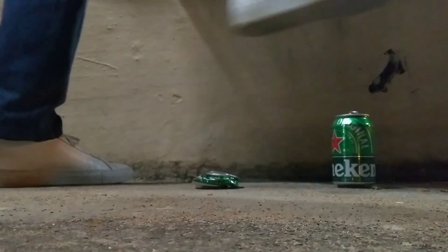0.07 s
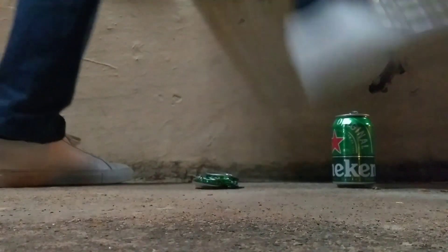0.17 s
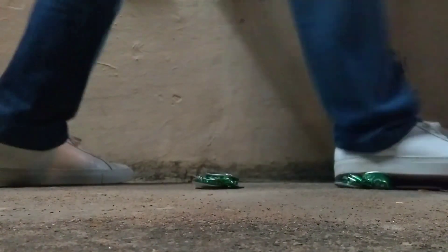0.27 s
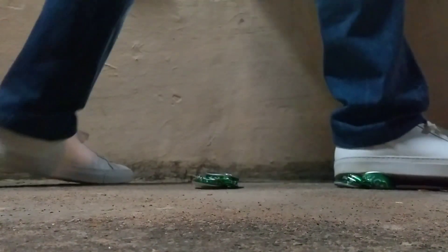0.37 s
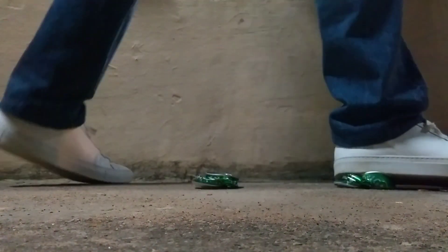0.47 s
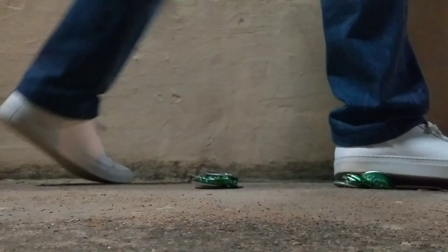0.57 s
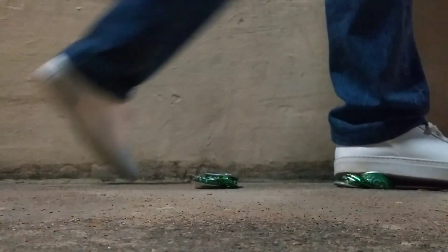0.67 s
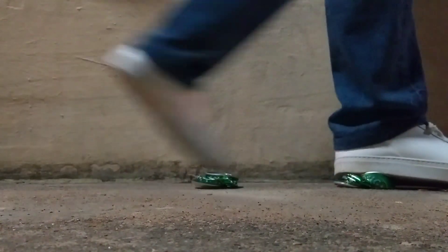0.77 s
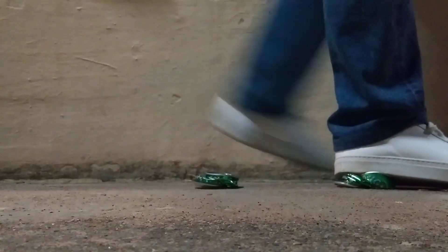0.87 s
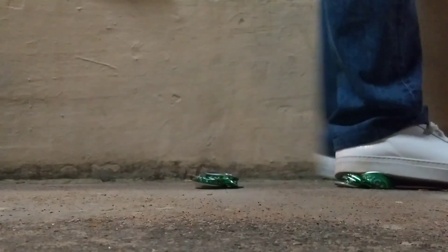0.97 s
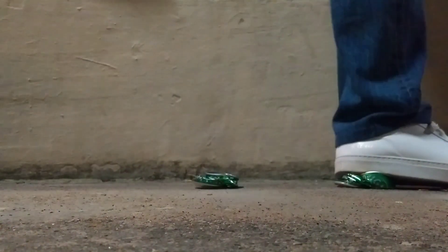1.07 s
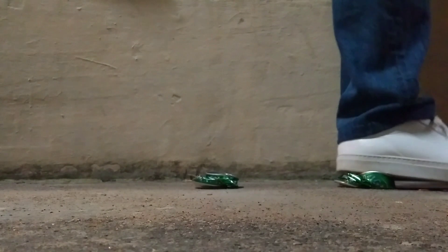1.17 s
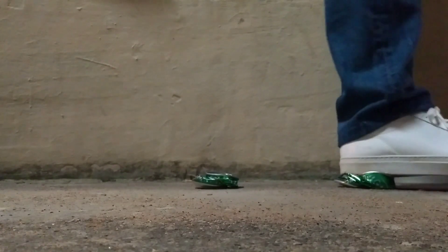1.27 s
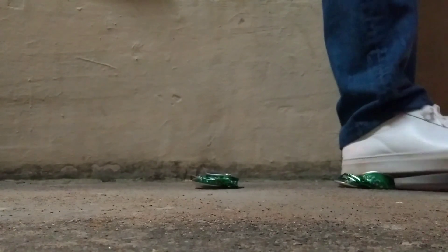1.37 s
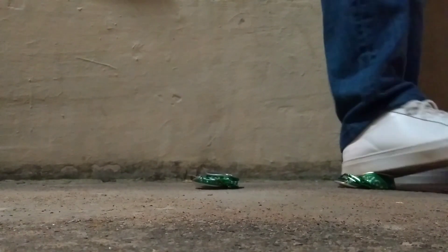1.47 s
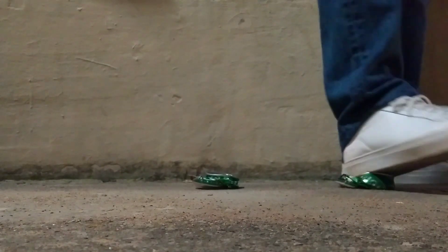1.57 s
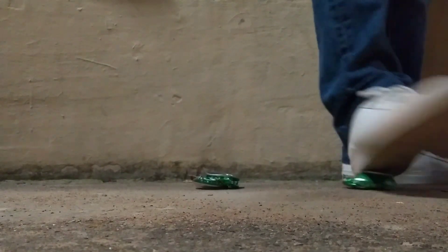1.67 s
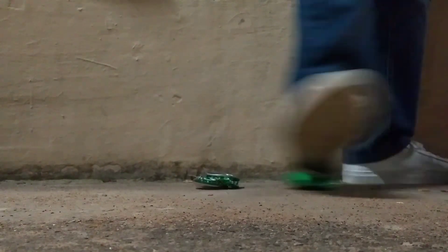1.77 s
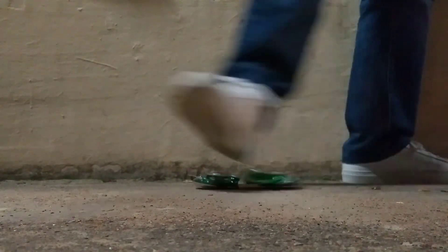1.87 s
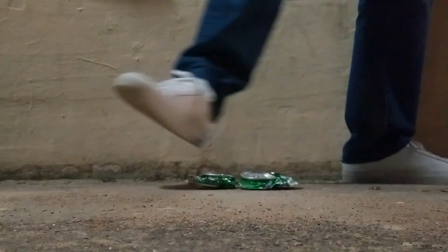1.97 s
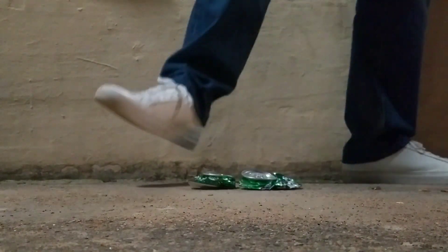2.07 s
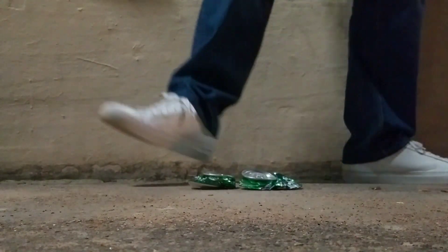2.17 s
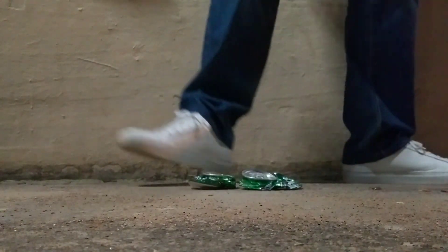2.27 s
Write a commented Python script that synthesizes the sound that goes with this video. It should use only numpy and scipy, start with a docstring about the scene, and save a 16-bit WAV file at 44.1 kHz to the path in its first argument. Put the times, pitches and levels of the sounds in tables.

```python
"""Over a steady rush and low rumble lies a faint bright hiss; then a shoe stamps an aluminium can flat on concrete.
The stamp is dense clicks exciting wall modes, with a noise thud and thump, loud enough to overload the microphone.
The crushed can creaks and snaps as the weight comes off, then is kicked aside and clatters to rest: each blow
is noise bursts around a sum of decaying sine modes, and grit is random clicks through a filter.
A bare room rings through convolution with banded noise; hiss and background are filtered noise."""
import sys
import numpy as np
from scipy import signal
from scipy.fft import rfft, irfft, next_fast_len
from scipy.io import wavfile

SR = 44100
rng = np.random.default_rng(int(sys.argv[2]) if len(sys.argv) > 2 else 0)


def store_wav(level_fs):
    """Save 16-bit WAV to argv[1]."""
    pcm = np.round(np.clip(np.atleast_2d(level_fs), -1, 1) * 32767)
    wavfile.write(sys.argv[1], SR, pcm.T.astype(np.int16))


N = 101430   # samples, 2.3 s
T = np.arange(N) / SR


def from_db(db):
    """Logarithmic level: 20 dB is a factor of ten in amplitude."""
    return 10 ** (np.asarray(db) / 20)


def rms_one(x):
    """Power normalisation: the root mean square becomes one."""
    return x / np.sqrt(np.mean(x ** 2) + 1e-20)


def level(rows):
    """Amplitude envelope: levels run straight in dB between points, and are silent outside them."""
    start_s, level_db = np.transpose(rows)
    return from_db(np.interp(T, start_s, level_db, left=-150, right=-150))


def at_hz(points, hz):
    """Logarithmic pitch: a table is interpolated evenly per octave."""
    pitch_hz, value = np.transpose(points)
    return np.interp(np.log(np.maximum(hz, 1)), np.log(pitch_hz), value)


def decay(t, t60):
    """Exponential decay: a positive t60 is the time to fall by 60 dB."""
    return np.exp(-np.log(1000) * t / t60)


def colour(x, points):
    """Minimum-phase filtering: the folded cepstrum makes it causal; white noise keeps its power."""
    size = 2 * next_fast_len(N)
    gain = rms_one(from_db(at_hz(points, np.fft.rfftfreq(size, 1 / SR))))
    cepstrum = irfft(np.log(gain))
    cepstrum[1:size // 2] *= 2
    cepstrum[size // 2 + 1:] = 0
    response = np.exp(rfft(cepstrum))
    return irfft(rfft(x, size) * response)[:N]


def grains(per_s, spread_db):
    """Shot noise: random clicks of uneven size and either sign, with unit power."""
    size_db = spread_db * np.minimum(rng.exponential(1, N), 3)
    sizes = from_db(size_db) * rng.choice([-1, 1], N)
    happens = rng.random(N) < per_s / SR
    return rms_one(sizes * happens)


def add(out, start_s, sound):
    """Superposition: a sound is summed in at its start time."""
    start = int(start_s * SR)
    out[start:start + len(sound)] += sound[:N - start]


# standard deviations from ring to ring: mode strength in dB, mode tuning as a fraction of its pitch
MODE_SPREAD_DB, MODE_DETUNE = 4.5, 0.014


def ringing(modes):
    """Modal superposition: decaying sines, each with a random strength, sign and tuning."""
    hz, db, t60 = np.transpose(modes)[:, :, None]
    strength, tuning = rng.standard_normal((2, len(modes), 1))
    gains = from_db(db + MODE_SPREAD_DB * strength) * rng.choice([-1, 1], hz.shape)
    t = T[:SR // 5]
    waves = np.sin(2 * np.pi * hz * (1 + MODE_DETUNE * tuning) * t) * decay(t, t60)
    return (gains * waves).sum(0) / np.sqrt(np.sum(gains ** 2))


# the can wall buckles under the stamp: start_s, level_db (of the crackle)
BUCKLING = [(.229, -42), (.2335, -3), (.238, 1.5), (.257, -9.5), (.263, -8.5), (.273, -16), (.277, -28),
            (.285, -9), (.2915, -31), (.295, -18), (.307, -28.5), (.318, -51)]
# spectrum of the buckling crackle: pitch_hz, level_db (relative)
BUCKLE_COLOUR = [(200, -37), (600, -20), (1200, 0.5), (2300, 2.5), (4000, 3.5), (8000, 1.5), (10500, 2),
                 (12000, -2.5), (15500, -12)]
# modes of the can wall: pitch_hz, level_db (relative)
WALL_MODES = [(781, -6), (945, -4), (1095, -5), (1202, -3), (1340, -5), (2660, -3), (4075, 0), (4457, -2),
              (4968, -2), (5290, -2), (5410, -3), (6722, -3), (7250, -4), (8167, 0), (10243, -4)]
# the sole drives the can into the floor: start_s, level_db
THUD = [(.2305, -20), (.232, -0.5), (.245, -5.5), (.259, -2.5), (.263, -26), (.295, -21.5), (.32, -55)]
# spectrum of the thud: pitch_hz, level_db (relative)
THUD_COLOUR = [(40, -15), (60, -4.5), (130, -5), (230, 0), (320, 1.5), (450, 0), (700, 1.5), (1200, -0.5),
               (1700, -6), (3000, -19)]
# the body's weight lands: start_s, level_db (of the low thump)
THUMP = [(.24, -41), (.258, -30.5), (.285, -22), (.31, -36), (.35, -65)]
# spectrum of the thump: pitch_hz, level_db (relative)
THUMP_COLOUR = [(30, -11.5), (45, -2), (57, 2.5), (90, -8), (160, -11), (300, -23), (1000, -56)]
BUCKLES_PER_S, BUCKLE_SPREAD_DB = 3500, 2
WALL_RING_DB, WALL_T60_S = -5, 0.03


def stamp():
    """Impulsive excitation: buckles ring modes that shift as the can folds; sole and weight add noise bursts."""
    buckles = grains(BUCKLES_PER_S, BUCKLE_SPREAD_DB) * level(BUCKLING)
    wall_modes = [(hz, db, WALL_T60_S) for hz, db in WALL_MODES]
    first, last = int(BUCKLING[0][0] * SR), int(BUCKLING[-1][0] * SR)
    wall = np.zeros(N)
    # twelve successive folds, each with freshly varied modes
    for fold in np.array_split(np.arange(first, last), 12):
        ring = ringing(wall_modes)
        ring = ring / np.linalg.norm(ring)
        add(wall, fold[0] / SR, signal.fftconvolve(buckles[fold], ring))
    crackle = colour(buckles, BUCKLE_COLOUR)
    thud = colour(rng.standard_normal(N) * level(THUD), THUD_COLOUR)
    thump = colour(rng.standard_normal(N), THUMP_COLOUR) * level(THUMP)
    return crackle + from_db(WALL_RING_DB) * wall + thud + thump


FAVOUR_DB, FAVOUR_OCTAVES = 7, .35   # greatest boost and its half-width (at 1/e of the dB)


def favoured(modes, centre_hz):
    """Position-dependent excitation: the point of contact brings out the modes near one pitch."""
    hz, db, t60 = np.transpose(modes)
    octaves = np.log2(hz / centre_hz)
    boost_db = FAVOUR_DB * np.exp(-(octaves / FAVOUR_OCTAVES) ** 2)
    return np.transpose([hz, db + boost_db, t60])


# spectrum of the bright contact noise and of the grit under the pinned can: pitch_hz, level_db (relative)
FIZZ_COLOUR = [(3500, -3.5), (6000, -5.5), (7500, 2), (8600, -1.5), (10300, 3.5), (12000, -10.5),
               (13600, -8), (15500, -20)]
# spectrum of the highest contact noise: pitch_hz, level_db (relative)
SPARKLE_COLOUR = [(9000, -30), (12000, -8), (13500, 3), (14400, -9), (15500, -16)]
CHATTER = 0.3   # strength of the tiny contacts after each blow's first


def blows(rows, gains_db, t60, modes, crack_colour):
    """Contact excitation: a dying flurry gives crack, rough ring, fizz and, for snaps, sparkle."""
    layers = np.zeros((4, N))
    t = T[:SR // 12]
    fade = decay(t, t60)
    for start_s, *levels_db, centre_hz in rows:
        flurry = rng.standard_normal((4, len(t))) * fade
        contact = flurry[1] * fade   # faded twice, so it dies twice as fast
        contact *= CHATTER / np.linalg.norm(contact)
        contact[0] += 1
        ring = ringing(favoured(modes, centre_hz))
        body = signal.fftconvolve(ring, contact)
        body *= np.linalg.norm(ring) / np.linalg.norm(body)
        sounds = flurry[0], body, flurry[2], flurry[3]
        # knocks have three levels, so their sparkle stays silent
        for layer, sound, level_db, gain_db in zip(layers, sounds, levels_db, gains_db):
            add(layer, start_s, from_db(level_db + gain_db) * sound)
    crack, body, fizz, sparkle = layers
    noise = colour(crack, crack_colour) + colour(fizz, FIZZ_COLOUR) + colour(sparkle, SPARKLE_COLOUR)
    return noise + body


# creases snap as the weight shifts and the foot rolls off; levels before SNAP_GAINS_DB:
# start_s, crack_db, body_db, fizz_db, sparkle_db, pitch_hz (of the favoured ring)
SNAPS = [(.3965, -46, -34, -34, -39, 4300), (1.1105, -31, -33, -44, -49, 4200),
         (1.1337, -49, -28, -29, -31, 4345), (1.1925, -39.5, -43, -28, -38.5, 10400),
         (1.218, -13.5, -14.5, -25, -21, 2620), (1.2345, -43, -45.5, -30, -41, 10400),
         (1.505, -25, -20, -21.5, -34, 2840), (1.522, -29, -35, -41, -46, 10400),
         (1.5411, -10.5, -11, -19.5, -38, 1420), (1.5554, -13.5, -19.5, -19, -32, 1370),
         (1.6313, -31, -27.5, -54, -55, 2000), (1.6523, -23, -23, -25.5, -38, 4300),
         (1.6684, -22, -30, -27, -42, 4270)]
# modes of the can pinned under the sole: pitch_hz, level_db (relative), t60_s
PINNED_MODES = [(1230, -6, .03), (1360, -1, .045), (1700, -7, .03), (2020, -8, .025), (2620, -6, .02),
                (3050, -9, .02), (3900, -10, .012), (4300, -7, .014), (4900, -9, .014), (5850, -11, .014),
                (9400, -14, .008), (10400, -12, .008)]
# spectrum of the snaps' crack: pitch_hz, level_db (relative)
PINNED_CRACK_COLOUR = [(150, -29), (600, 0), (1300, 10.5), (2000, -12), (2330, -2), (2700, 2), (3500, -8),
                       (5000, -1), (6300, -11), (9000, -7)]
# grit grinds under the can in place: start_s, level_db
GRINDING = [(1.05, -77.5), (1.06, -50), (1.08, -49), (1.125, -59), (1.155, -48), (1.175, -59), (1.24, -47),
            (1.28, -67), (1.32, -82), (1.47, -65.5), (1.53, -52.5), (1.565, -33), (1.59, -54), (1.625, -61),
            (1.675, -37)]
SNAP_GAINS_DB, SNAP_T60_S = (-8, 0, -4, -6), 0.035   # gains of crack, body, fizz, sparkle
GRIT_PER_S, GRIT_SPREAD_DB = 1500, 3.5   # also used for the slide


def creaking():
    """Stored strain released: the pinned can grinds on grit and its creases spring back."""
    grit = colour(grains(GRIT_PER_S, GRIT_SPREAD_DB) * level(GRINDING), FIZZ_COLOUR)
    snaps = blows(SNAPS, SNAP_GAINS_DB, SNAP_T60_S, PINNED_MODES, PINNED_CRACK_COLOUR)
    return grit + snaps


# the kicked can hits shoe and floor; levels before KNOCK_GAINS_DB:
# start_s, crack_db, body_db, fizz_db, pitch_hz (of the favoured ring)
KNOCKS = [(1.6848, -18, -21, -27, 1250), (1.6935, -41, -28, -24, 3080), (1.7011, -9, -11.5, -16, 1270),
          (1.7135, 0.5, -6, -24, 2070), (1.7195, 3.5, -0.5, -6, 2600), (1.7265, -7, -5, -23, 1300),
          (1.7342, -15, -16, -18, 1210), (1.7438, -18, -8, -13, 1600), (1.7544, -22, -4, -27, 1150),
          (1.7595, -30, -14, -23.5, 1090), (1.7806, -19, -12, -22, 1770), (1.7918, -11, -6, -34, 1750),
          (1.7985, -30, -26, -25.5, 3100), (1.8212, -39, -18, -37, 1870), (1.830, -33, -11, -33, 1520),
          (1.8516, -26, -15, -33, 1300), (1.8545, -21.5, -24, -33, 1174), (1.8749, -25, -17.5, -43, 1190),
          (1.9132, -16, -15, -29, 1520), (1.933, -27, -26, -37, 2030), (1.949, -29, -22, -38, 1550),
          (1.956, -30, -45, -47, 2030), (1.9728, -48, -26, -53, 3150), (1.9925, -52, -38, -53, 3161),
          (2.0063, -35, -32.5, -48, 3120), (2.0385, -30, -43, -43.5, 3100), (2.1208, -45, -51, -57, 5300),
          (2.1939, -43.5, -49, -55, 5400)]
# modes of the loose, flattened can: pitch_hz, level_db (relative), t60_s
LOOSE_MODES = [(685, -11, .035), (1090, -3, .045), (1225, -5, .035), (1592, -2, .04), (1675, -4, .035),
               (1905, -1, .035), (2025, -1, .035), (2490, -7, .03), (2672, -7, .03), (2980, -8, .03),
               (3115, -7, .04), (3400, -12, .03), (3980, -10, .03), (5100, -18, .025)]
# spectrum of the knocks' crack: pitch_hz, level_db (relative)
LOOSE_CRACK_COLOUR = [(150, -19.5), (600, 1), (1300, 3), (1900, 4), (2330, -6.5), (2700, -1), (3300, 0.5),
                      (4200, -3), (5100, -2.5), (6300, -4.5), (9000, -23)]
# grit grinds under the can as it slides: start_s, level_db
SLIDE = [(1.683, -34), (1.688, -24), (1.711, -17), (1.715, -9.5), (1.725, -10), (1.738, -21.5),
         (1.765, -46), (1.80, -44), (1.84, -40), (1.90, -52), (1.95, -38.5), (2.04, -53), (2.08, -58)]
# spectrum of the sliding scrape: pitch_hz, level_db (relative)
SLIDE_COLOUR = [(80, -29), (300, 5.5), (700, -0.5), (1200, 13), (2000, -7), (2330, -17), (2700, 7.5),
                (4200, -0.5), (6300, -5), (10300, -5.5), (12000, -13), (15500, -20)]
KNOCK_GAINS_DB, KNOCK_T60_S = (-2, 3, 0.5), 0.03   # gains of crack, body, fizz


def kick():
    """Sliding friction and repeated impact: the flat can scrapes over the concrete and rocks to rest."""
    scrape = colour(grains(GRIT_PER_S, GRIT_SPREAD_DB) * level(SLIDE), SLIDE_COLOUR)
    knocks = blows(KNOCKS, KNOCK_GAINS_DB, KNOCK_T60_S, LOOSE_MODES, LOOSE_CRACK_COLOUR)
    return scrape + knocks


# a faint bright hiss, fading slightly before the stamp: start_s, level_db
HISS = [(0, -54), (.08, -54), (.16, -55), (.23, -58)]
# spectrum of the hiss: pitch_hz, level_db (relative)
HISS_COLOUR = [(1000, -6), (3500, -2), (8500, -5.5), (11000, -12), (15000, -31)]


def faint_hiss():
    """Shaped noise: filtered noise under a slow envelope."""
    return colour(rng.standard_normal(N), HISS_COLOUR) * level(HISS)


# reverberation time, where a negative one makes the band swell: pitch_hz, t60_s
ROOM_T60 = [(250, -2.2), (1000, 2.5), (3500, 1.74), (8000, 1), (11000, 0.28), (14000, .32)]
# strength of the tail by band: pitch_hz, level_db
ROOM_COLOUR = [(100, -34), (1000, -20.5), (2300, -27), (3800, -24), (5500, -27.5), (8500, -23),
               (12000, -22.5), (15000, -28.5)]
ROOM_BUILD_S = 0.004   # time constant of the onset
ECHO_S, ECHO_WIDTH_S, ECHO_GAIN = .11, 0.075, 2.1   # a cluster of reflections from the far wall


def room(x):
    """Diffuse reverberation: a one-second noise tail, dying band by band but swelling in the lowest bands."""
    t, edges = T[:SR], np.geomspace(100, 17000, 20)
    tail = np.zeros(SR)
    for low, high in zip(edges, edges[1:]):
        hz = np.sqrt(low * high)
        fade = decay(t, at_hz(ROOM_T60, hz)) * (1 - np.exp(-t / ROOM_BUILD_S))
        fade *= 1 + ECHO_GAIN * np.exp(-((t - ECHO_S) / ECHO_WIDTH_S) ** 2)
        band_filter = signal.butter(2, [low, high], "band", fs=SR, output="sos")
        band = signal.sosfilt(band_filter, rng.standard_normal(SR))
        tail += from_db(at_hz(ROOM_COLOUR, hz)) * band * fade / np.linalg.norm(fade)
    return signal.fftconvolve(x, tail)[:N]


# spectrum of the steady rush: pitch_hz, level_db (relative, per Hz)
RUSH = [(15, -37.5), (25, -5.5), (48, 0), (75, 2.5), (113, -1.5), (169, -5.5), (274, -8), (340, -9.5),
        (421, -10), (582, -7.5), (871, -5.5), (1050, -5.5), (1410, -9), (1800, -19.5), (1950, -19.5),
        (2700, -33), (3170, -30), (4500, -37), (5430, -43.5), (5880, -43.5), (7700, -42.5), (10100, -56.5),
        (15500, -54.5)]
RUSH_DB = -30.5
RUMBLE_HZ, RUMBLE_WIDTH_HZ, RUMBLE_DB = 61.5, 54, -43


def background():
    """Resonance-filtered noise: a steady broadband rush with a wavering low rumble."""
    radius = np.exp(-np.pi * RUMBLE_WIDTH_HZ / SR)
    poles = [1, -2 * radius * np.cos(2 * np.pi * RUMBLE_HZ / SR), radius * radius]
    rumble = signal.lfilter([1, 0, -1], poles, rng.standard_normal(N + SR))[SR:]   # already settled
    rush = colour(rng.standard_normal(N), RUSH)
    return from_db(RUSH_DB) * rms_one(rush) + from_db(RUMBLE_DB) * rms_one(rumble)


STAMP_ROOM_DB = -2.5   # the stamp's share in the room, against that of the small sounds


def scene():
    """Linear superposition: direct sounds, room and background, alike in both channels."""
    crush = stamp()
    small = creaking() + kick()
    reverberation = room(from_db(STAMP_ROOM_DB) * crush + small)
    mono = crush + small + faint_hiss() + reverberation + background()
    return np.tile(mono, (2, 1))


OVERLOAD, KNEE = .7, 5   # amplitude limit; a higher knee bends more sharply
CUTOFF_HZ = 15700


def record(dry):
    """Band-limited saturation: the deepest bass is cut, the loudest peaks overload, the top is cut."""
    bass_cut = signal.butter(5, 41, "high", fs=SR, output="sos")
    dry = signal.sosfilt(bass_cut, dry)
    clipped = dry / (1 + np.abs(dry / OVERLOAD) ** KNEE) ** (1 / KNEE)
    top_cut = signal.ellip(12, .1, 90, CUTOFF_HZ, fs=SR, output="sos")
    return signal.sosfilt(top_cut, clipped)


dry = scene()
out = record(dry)
store_wav(out)
```